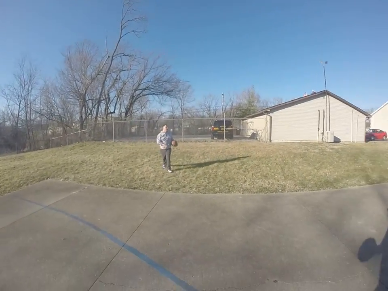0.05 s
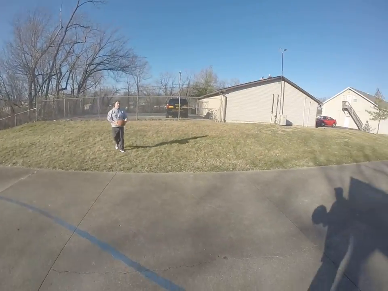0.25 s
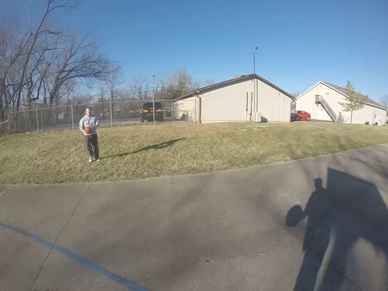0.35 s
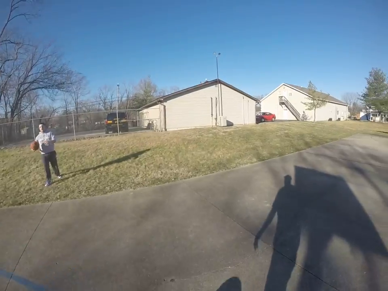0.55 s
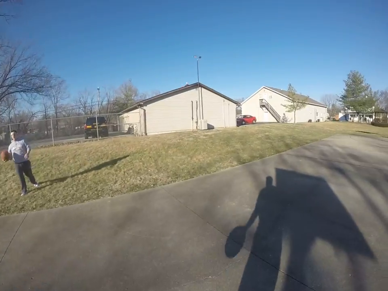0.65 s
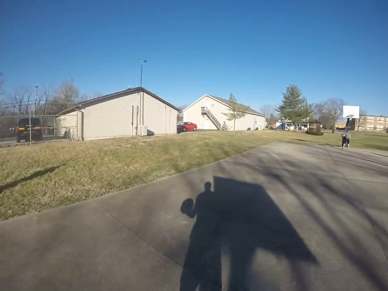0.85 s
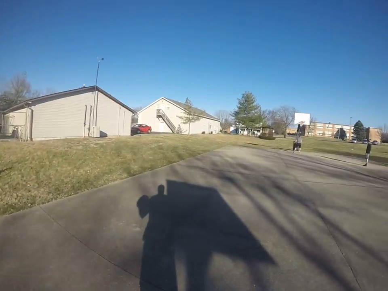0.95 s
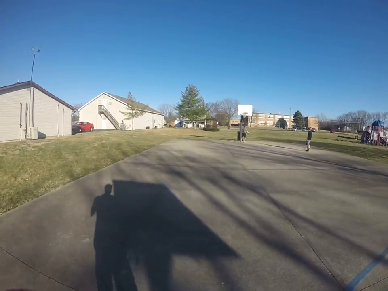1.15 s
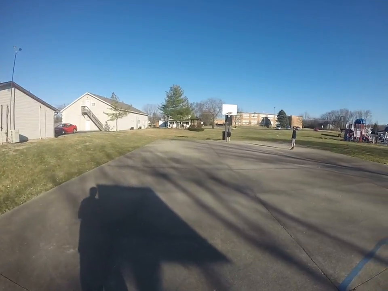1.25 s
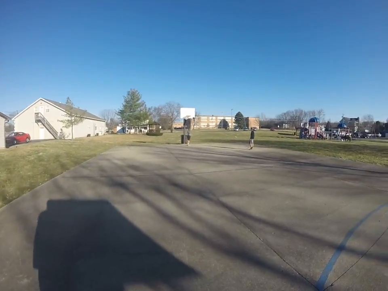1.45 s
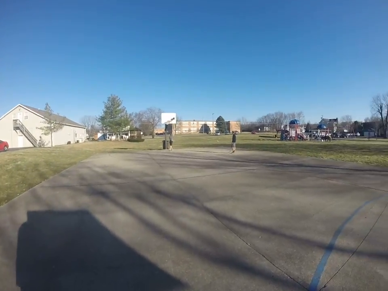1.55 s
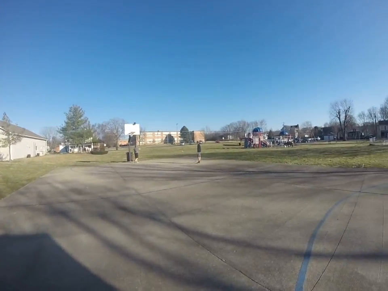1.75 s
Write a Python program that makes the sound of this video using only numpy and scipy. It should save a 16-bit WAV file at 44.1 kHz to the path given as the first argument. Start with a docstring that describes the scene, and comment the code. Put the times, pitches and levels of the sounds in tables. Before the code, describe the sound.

A basketball bounces twice on an outdoor paved court, with hand slaps and low wind rumble.

```python
"""Basketball dribbled on a paved court

Two bounces, heard from a small camera worn by the player. Each is a crack, a short thump as the
ball squashes and a knock at lift-off; the air inside rings faintly. Hand slaps, light scuffs and
handling bumps come between; wind buffets the microphone over a far knock and a steady distant hush."""
import sys
import numpy as np
from scipy import signal
from scipy.fft import rfft, irfft
from scipy.io import wavfile
from scipy.ndimage import uniform_filter1d, minimum_filter1d

SR = 44100
rng = np.random.default_rng(int(sys.argv[2]) if len(sys.argv) > 2 else 0)


def dump(signal):
    """Clip the signal to [-1, 1] and save it as 16-bit WAV at the path in sys.argv[1]."""
    limited = np.clip(np.atleast_2d(signal).T, -1, 1)
    pcm = np.round(limited * 32767).astype(np.int16)
    wavfile.write(sys.argv[1], SR, pcm)


N = 79380
TIME = np.arange(N) / SR


def bounces():
    """Impact, two close reflections and a soft lift-off drive the shell; a faint tail follows."""
    # (time [s], level [dB], reflection 1 delay [s], its level [dB], reflection 2 delay [s],
    #  its level [dB], contact [s], lift-off [dB], thump [dB], tail [dB], grit and scatter treble [dB])
    landings = [(.6096, 1.5, 0.002843, -1, 0.00346, -2.5, .01015, -4, -6, -2, -21),
                (1.4981, -2, 0.00242, 2, 0.0034, 7, .01017, 6, -2, 1, -3)]
    # shell modes, excited by landing spot: (frequency [Hz], t60 [s], bounce 1 [dB], bounce 2 [dB])
    shell_modes = [(436, 0.021, -10, -13.5), (538, 0.01, -8.5, -7.5), (632, 0.018, -24, -13),
                   (736, 0.029, -31, -22), (894, 0.01, -7.5, -40), (946, 0.023, -26.5, -30.5),
                   (1436, 0.0091, -18.5, -16.5), (1975, 0.013, -14.5, -52), (2270, 0.019, -27, -18),
                   (2660, 0.0074, -21.5, -32), (3073, 0.016, -19, -17.5), (5200, 0.012, -43, -21),
                   (5540, .011, -22.5, -24.5), (6080, 0.01, -29.5, -19), (8470, 0.0017, -13.5, -38)]
    # air modes inside the ball: (frequency [Hz], t60 [s], bounce 1 [dB], bounce 2 [dB])
    air_modes = [(965, 0.13, -25.5, -36.5), (1060, 0.29, -48.5, -40), (1464, 0.45, -56, -54),
                 (1620, 0.11, -51, -51), (2140, 0.47, -52, -58), (2696, 0.26, -47, -52),
                 (2781, 0.11, -42, -59), (3270, 0.16, -56.5, -43.5), (3720, 0.15, -53, -54),
                 (4590, 0.092, -50.5, -52), (5100, 0.13, -53, -52), (5960, .12, -59, -49.5),
                 (6260, 0.092, -48, -55), (6870, .11, -48, -48)]
    impact_top_hz, reflection_top_hz, lift_top_hz = 6680, 1350, 1050
    out = np.zeros(N)
    for index, (at_s, level_db, first_s, first_db, second_s, second_db,
                contact_s, lift_db, thump_db, tail_db, treble_db) in enumerate(landings):
        hit = soften(click(at_s), impact_top_hz, poles=5)
        # off the player's body and the ground
        reflections = from_db(first_db) * click(at_s + first_s)
        reflections += from_db(second_db) * click(at_s + second_s)
        lift = from_db(lift_db) * soften(click(at_s + contact_s), lift_top_hz)
        drive = hit - soften(reflections, reflection_top_hz) - lift
        shell = body(drive, [(hz, db[index], t60_s) for hz, t60_s, *db in shell_modes])
        air = body(hit, [(hz, db[index], t60_s) for hz, t60_s, *db in air_modes])
        contact = shell + from_db(thump_db) * thump(at_s) + grit(at_s, contact_s, treble_db)
        tail = air + court_scatter(at_s, treble_db)
        out += from_db(level_db) * (contact + from_db(tail_db) * tail)
    return out


def thump(at_s, pitch_hz=108, length_s=0.0155):
    """The ball flattens and springs back: about two low cycles under a smooth swell."""
    age_s = TIME - at_s
    swell = np.sin(np.pi * np.clip(age_s / length_s, 0, 1)) ** 2.8
    return swell * np.cos(2 * np.pi * pitch_hz * (age_s - length_s / 2))


def grit(at_s, contact_s, treble_db, gain_db=-18, decay_s=0.0033, peel_db=-8, peel_top_hz=2600):
    """Pebbled skin crunches on the pavement; weaker and duller as it peels off."""
    # crunch spectrum: (frequency [Hz], relative density [dB])
    spectrum = [(500, -32), (1100, 10.5), (2000, 4), (3400, 9), (4200, -25), (5600, -40), (6600, -2),
                (7500, -9), (9000, -20.5), (10500, -52), (15000, -51.5)]
    skin = from_db(gain_db) * noise(shelve(spectrum, treble_db))
    landing, peel = (skin * (TIME >= start_s) * np.exp(-((TIME - start_s) / decay_s) ** 2)
                     for start_s in (at_s, at_s + contact_s))
    return landing + from_db(peel_db) * soften(peel, peel_top_hz)


def court_scatter(at_s, treble_db, gain_db=-40, t60_s=0.77):
    """The court scatters a bounce back as dying noise."""
    # scatter spectrum: (frequency [Hz], relative density [dB])
    spectrum = [(100, 6), (400, -1), (900, 8), (1300, -23.5), (3000, -6.5), (4200, -15), (6200, -13),
                (8000, -41.5), (15000, -52)]
    decay = (TIME > at_s) * from_db(-60 * np.abs(TIME - at_s) / t60_s)
    return from_db(gain_db) * decay * noise(shelve(spectrum, treble_db))


def slaps_and_taps():
    """A dull handling bump, then hard and soft slaps and taps."""
    # impacts: (time [s], level [dB], low-pass [Hz])
    impacts = [(0.2767, -0.5, 587), (0.4233, -0.5, 3530), (.4345, -1.5, 800), (0.437, -11.5, 1700),
               (.4690, -14.5, 2800), (1.1313, -0.5, 770)]
    # modes rung by each impact: (frequency [Hz], level [dB], t60 [s])
    modes = [(331, -39, 0.09), (775, -27.5, 0.045), (1055, -21, 0.011), (1450, -21.5, 0.0077),
             (2310, -16.5, 0.0068), (2875, -14, 0.0072), (3220, -27.5, .006), (6100, -23, 0.0046)]
    drive = sum(from_db(db) * soften(click(at_s), top_hz) for at_s, db, top_hz in impacts)
    return body(drive, modes)


def noise_bursts():
    """Brief noise bursts: slap grit, light scuffs and faint echoes."""
    # bursts: (time [s], level [dB], centre [Hz], length [s])
    bursts = [(.184, -59, 8900, 0.0031), (.197, -63.5, 9700, 0.0054), (.4235, -43.5, 1050, 0.012),
              (0.434, -35.5, 2070, 0.0045), (0.472, -51, 2690, 0.0058), (.853, -40.5, 520, 0.025),
              (0.912, -59, 5030, 0.0043), (.925, -55.5, 5160, 0.0028), (1.104, -35, 750, 0.0056),
              (1.105, -55.5, 4750, 0.0052), (1.189, -48.5, 1600, 0.0059), (1.352, -56, 5100, 0.0092),
              (1.5835, -48.5, 5400, 0.002)]
    return swishes(bursts)


def bumps():
    """The player's movement jolts the camera, which rocks for a few cycles."""
    # jolts: (time [s], drive [dB], frequency [Hz], t60 [s])
    jolts = [(0.231, -17, 47.7, 0.13), (0.2722, -8, 86.4, 0.035), (.302, -16, 67.6, .06),
             (0.333, -19, 107, 0.072), (0.426, -14, 106, 0.035), (0.471, -20, 111, .07),
             (0.841, -24.5, 38.8, 0.22), (1.579, -29.5, 87, 0.096)]
    return -sum(from_db(db) * ring(soften(click(at_s), top_hz=200), hz, t60_s)
                for at_s, db, hz, t60_s in jolts)


def wind():
    """Gusts at the microphone: deep rumble with flutter above it."""
    # gust envelope: (time [s], rumble [dB], flutter [dB])
    gusts = [(0, -41.5, -48.5), (.21, -42, -43), (.235, -34, -37.5), (.275, -33, -29.5),
             (0.341, -23.5, -27.5), (.41, -30, -38.5), (0.481, -39.5, -39), (.56, -36, -42),
             (.69, -34.5, -44), (.8, -45, -48), (.86, -35, -45), (.94, -37, -52.5), (1.3, -43.5, -46),
             (1.37, -33, -43), (1.439, -44, -46), (1.58, -28.5, -45), (1.66, -41.5, -47.5),
             (1.8, -41.5, -50.5)]
    # spectra of the two wind bands: (frequency [Hz], relative density [dB])
    rumble_spectrum = [(15, -1), (40, -5), (85, 0), (130, -13), (250, -52), (600, -80), (5000, -120)]
    flutter_spectrum = [(60, -19.5), (150, 2), (270, -6.5), (480, -11.5), (900, -29), (2000, -46.5),
                        (8000, -98)]
    at_s, rumble_db, flutter_db = np.transpose(gusts)
    rumble = from_db(np.interp(TIME, at_s, rumble_db)) * noise(rumble_spectrum)
    flutter = from_db(np.interp(TIME, at_s, flutter_db)) * noise(flutter_spectrum)
    return rumble + flutter


def far_echoes():
    """Buildings return a faint, smeared echo of each bounce."""
    # echoes: (time [s], level [dB], centre [Hz], length [s])
    echoes = [(.684, -49, 2520, 0.01), (1.676, -48.5, 1750, .0061)]
    return swishes(echoes)


def far_knock(at_s=1.1068, drive_db=-29):
    """As of another ball down the court: distance leaves one dull note."""
    return from_db(drive_db) * ring(soften(click(at_s), top_hz=1350), hz=785, t60_s=0.055)


def distant_hush(hush_db=-40.5, whine_db=-71):
    """Steady hush with a faint wavering whine."""
    # hush spectrum: (frequency [Hz], relative density [dB])
    spectrum = [(30, 3), (150, 3), (320, -1), (600, 1), (850, -1.5), (1200, -15.5), (1800, -19.5),
                (2900, -18), (3900, -29.5), (4900, -28), (6500, -33), (7800, -40.5), (11000, -44.5),
                (15000, -52)]
    whine = ring(rng.standard_normal(N), hz=4690, t60_s=0.023)
    return from_db(hush_db) * noise(spectrum) + from_db(whine_db) * whine / whine.std()


def from_db(db):
    """Decibels to gain."""
    return 10 ** (np.asarray(db) / 20)


def noise(spectrum):
    """Unit-rms noise shaped by (frequency [Hz], relative density [dB]) points."""
    hz, db = np.transpose(spectrum)
    bins_hz = np.maximum(np.fft.rfftfreq(N, 1 / SR), 1)
    gain = from_db(np.interp(np.log(bins_hz), np.log(hz), db))
    x = irfft(rfft(rng.standard_normal(N)) * gain, N)
    return x / x.std()


def shelve(spectrum, treble_db, start_hz=2500, full_hz=5400):
    """Treble shelf on spectrum points."""
    return [(hz, db + np.interp(hz, [start_hz, full_hz], [0, treble_db])) for hz, db in spectrum]


def click(at_s):
    """Unit impulse."""
    return (np.arange(N) == int(at_s * SR)) + 1e-18


def soften(x, top_hz, poles=3):
    """Low-pass: a softer contact."""
    return signal.sosfilt(signal.butter(poles, top_hz, fs=SR, output="sos"), x)


def ring(x, hz, t60_s):
    """One mode: a unit click starts a dying sine of height 1."""
    radius = from_db(-60 / (t60_s * SR))
    step_rad = 2 * np.pi * hz / SR
    return signal.lfilter([0, np.sin(step_rad)], [1, -2 * radius * np.cos(step_rad), radius ** 2], x)


def body(x, modes):
    """All modes of an object, driven together."""
    return sum(from_db(db) * ring(x, hz, t60_s) for hz, db, t60_s in modes)


def swishes(events, log_half_width=0.23):
    """Noise bands that swell and die."""
    out = np.zeros(N)
    for at_s, db, centre_hz, length_s in events:
        edges_hz = centre_hz * np.exp([-log_half_width, log_half_width])
        bandpass = signal.butter(2, edges_hz, "band", fs=SR, output="sos")
        band = signal.sosfilt(bandpass, rng.standard_normal(N))
        progress = np.maximum(TIME - at_s, 0) / (length_s / 2)
        out += from_db(db) * progress * np.exp(1 - progress) * band / band.std()
    return out


def scene():
    """Ball, player, wind and distance in one channel."""
    near = bounces() + slaps_and_taps() + noise_bursts() + bumps()
    return (near + far_echoes() + wind() + far_knock() + distant_hush())[None]


def record(dry):
    """A fast limiter holds the bounces under full scale; the top is cut."""
    ceiling, window_s, cutoff_hz = 0.93, 0.0016, 15600
    size = int(window_s * SR)
    gain = minimum_filter1d(ceiling / np.maximum(np.abs(dry), ceiling), 2 * size + 1)
    gain = uniform_filter1d(uniform_filter1d(gain, size), size)
    return signal.sosfilt(signal.cheby2(12, 70, cutoff_hz, fs=SR, output="sos"), gain * dry)


dry = scene()
out = record(dry)
dump(out)
```